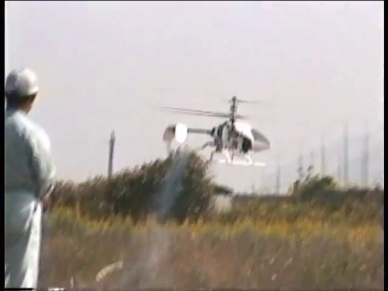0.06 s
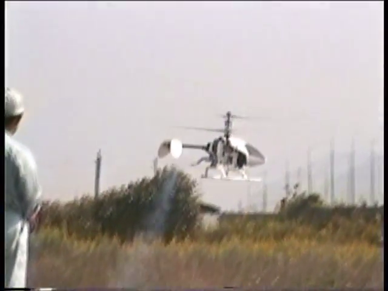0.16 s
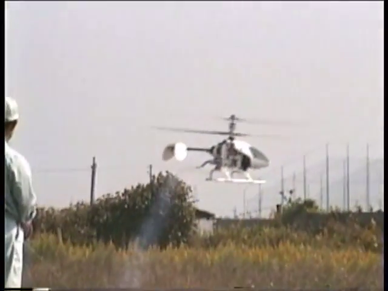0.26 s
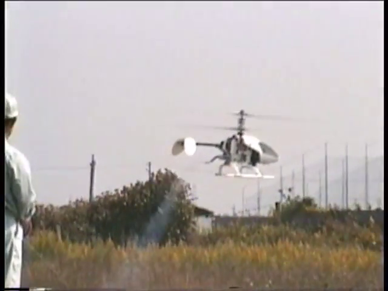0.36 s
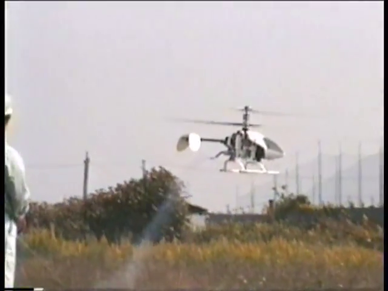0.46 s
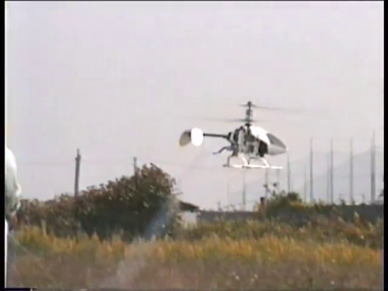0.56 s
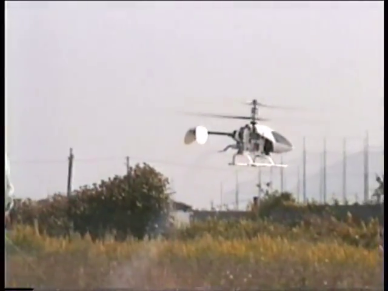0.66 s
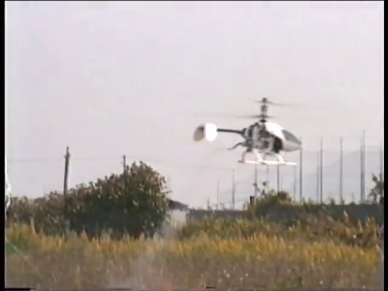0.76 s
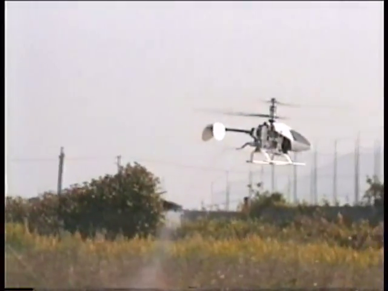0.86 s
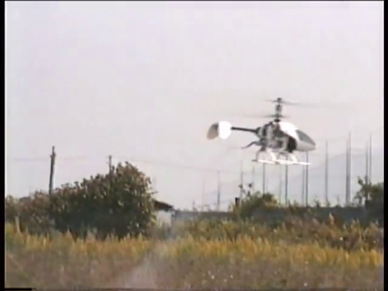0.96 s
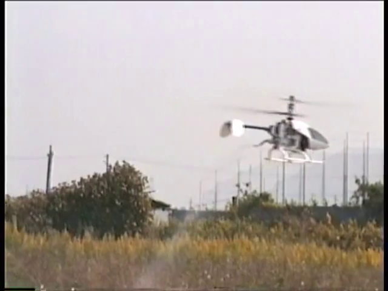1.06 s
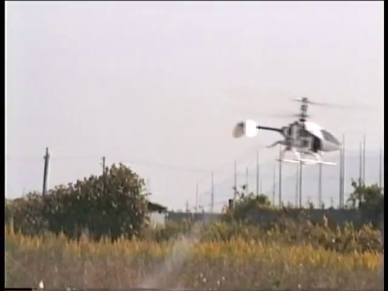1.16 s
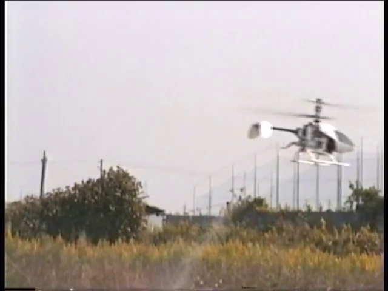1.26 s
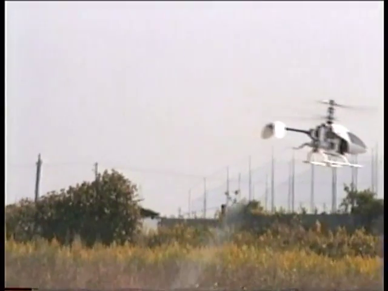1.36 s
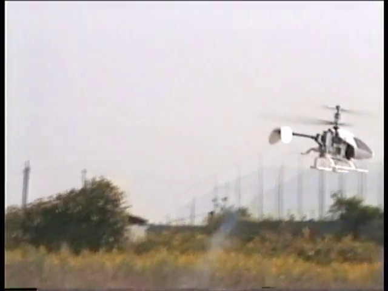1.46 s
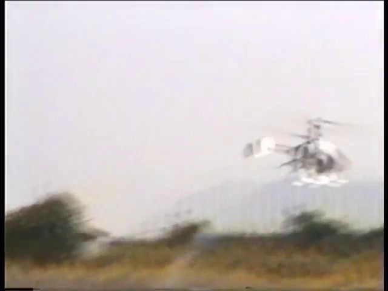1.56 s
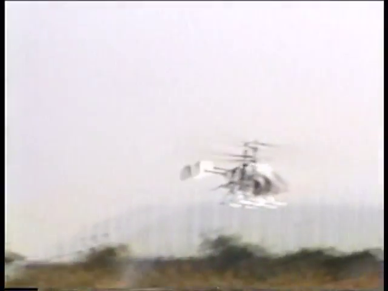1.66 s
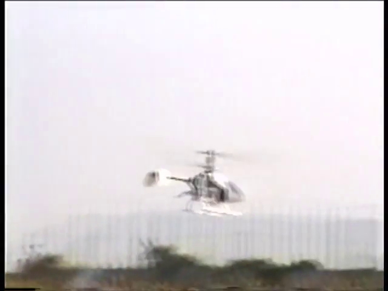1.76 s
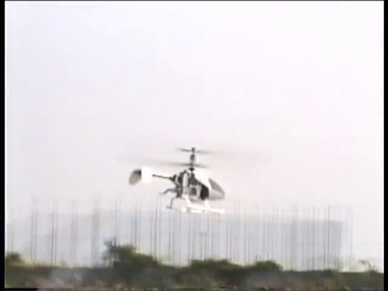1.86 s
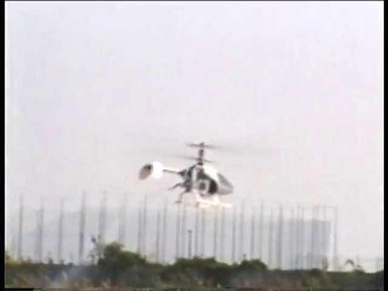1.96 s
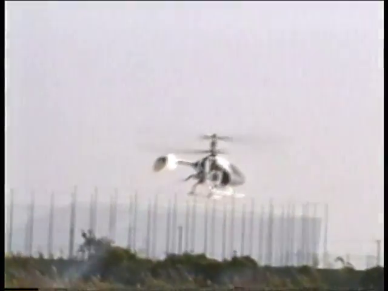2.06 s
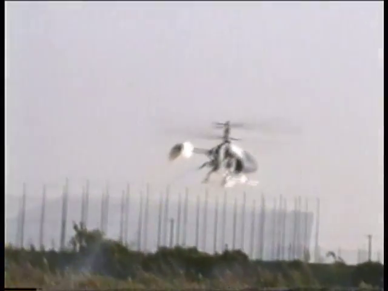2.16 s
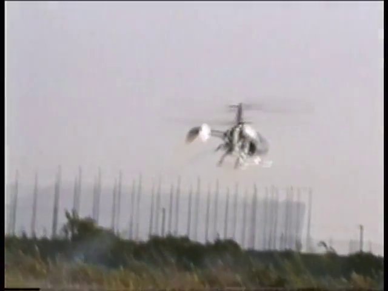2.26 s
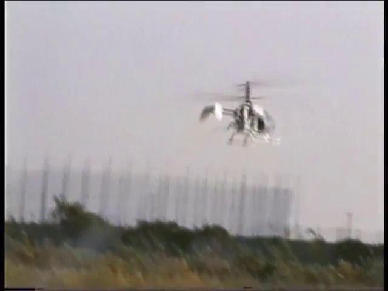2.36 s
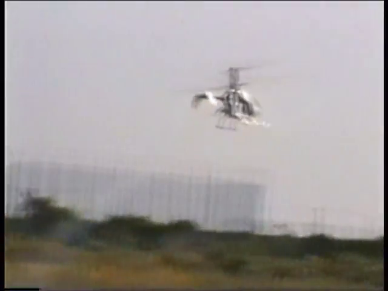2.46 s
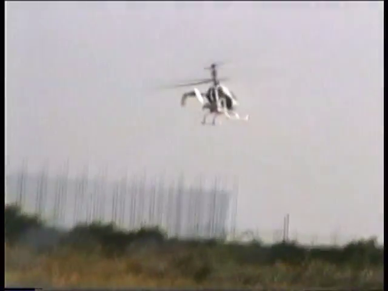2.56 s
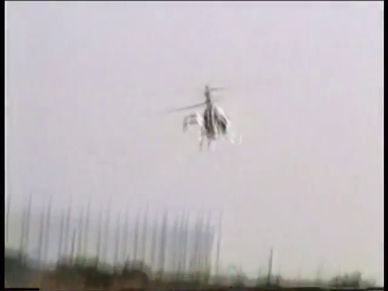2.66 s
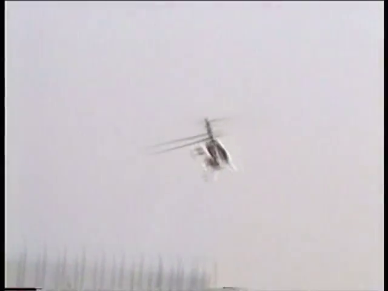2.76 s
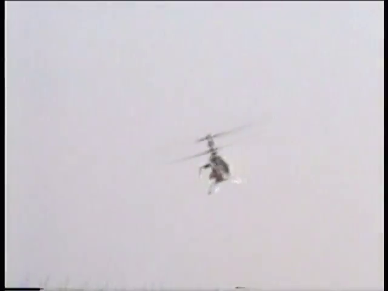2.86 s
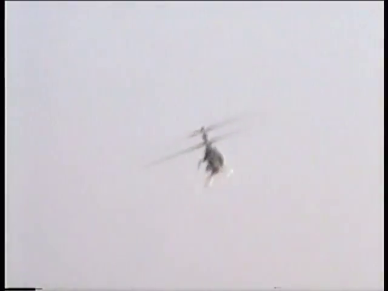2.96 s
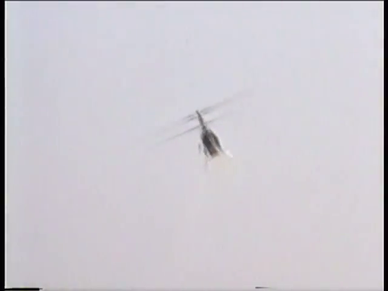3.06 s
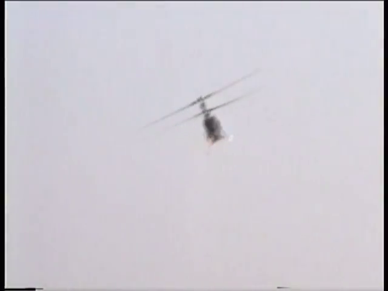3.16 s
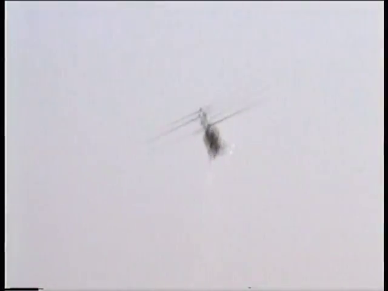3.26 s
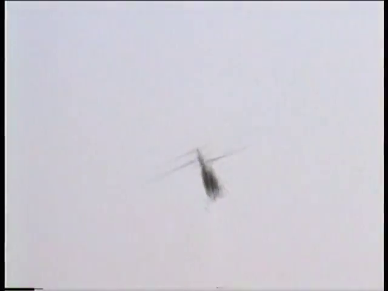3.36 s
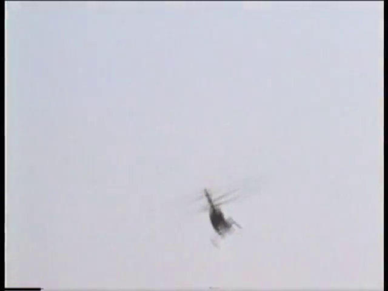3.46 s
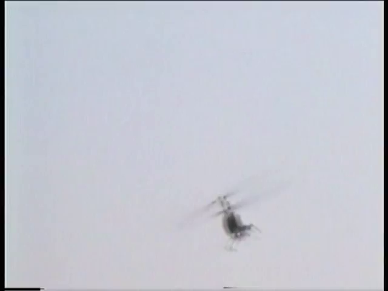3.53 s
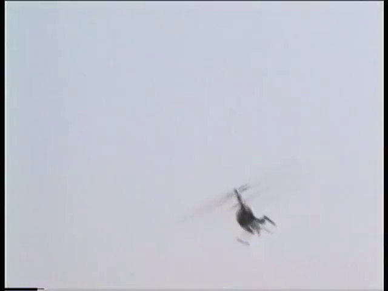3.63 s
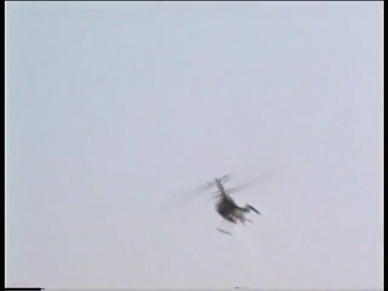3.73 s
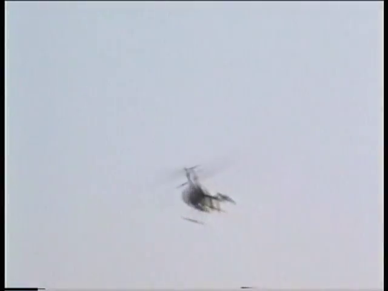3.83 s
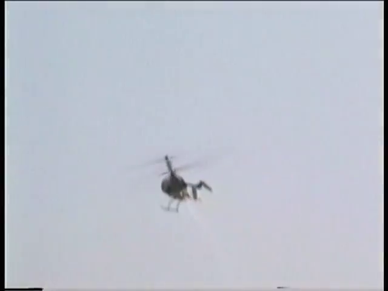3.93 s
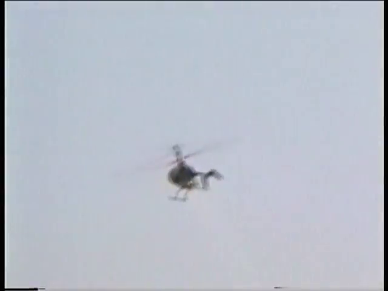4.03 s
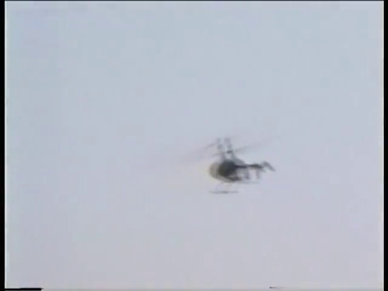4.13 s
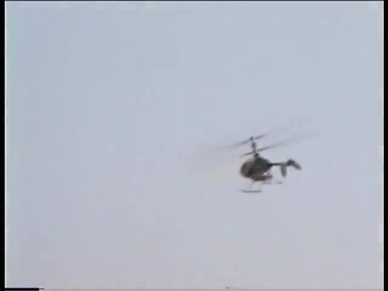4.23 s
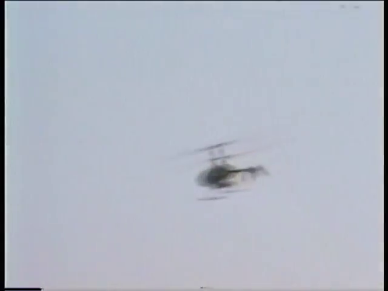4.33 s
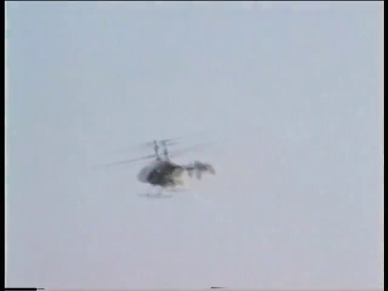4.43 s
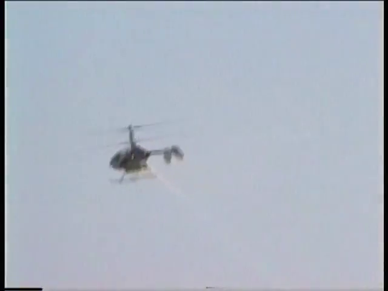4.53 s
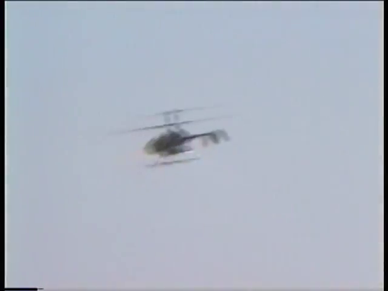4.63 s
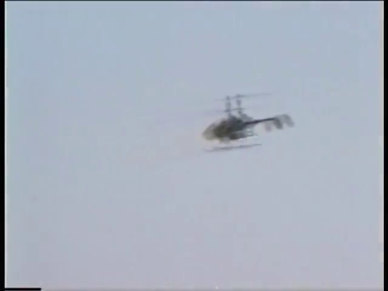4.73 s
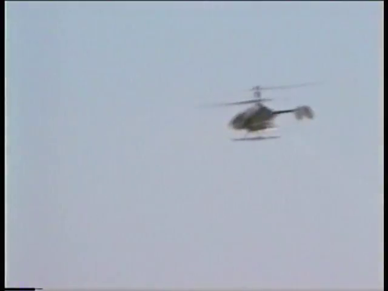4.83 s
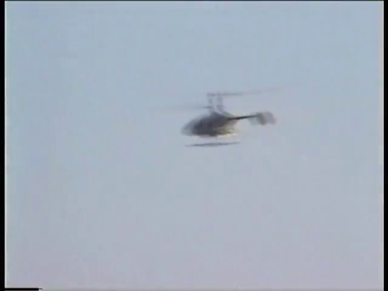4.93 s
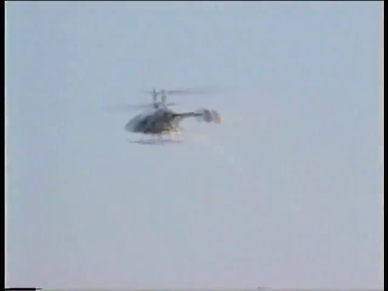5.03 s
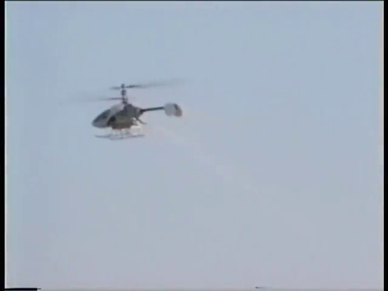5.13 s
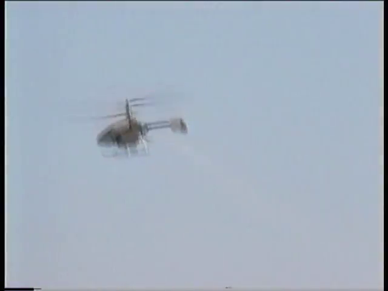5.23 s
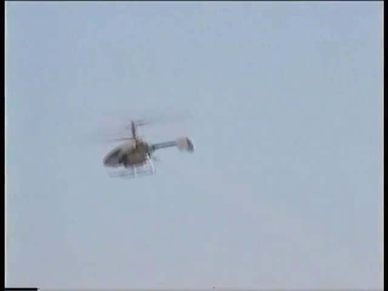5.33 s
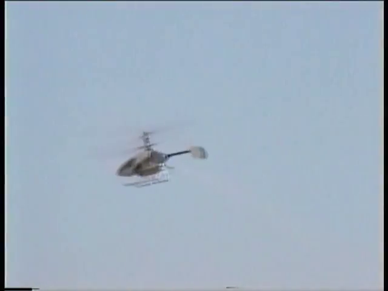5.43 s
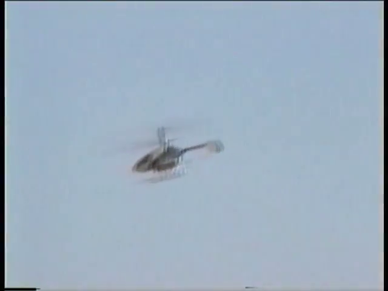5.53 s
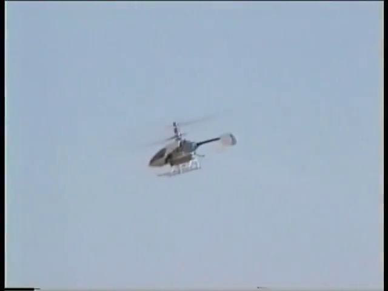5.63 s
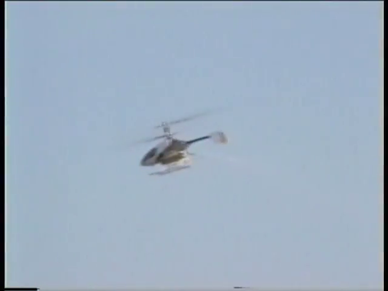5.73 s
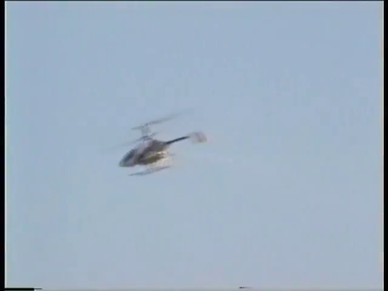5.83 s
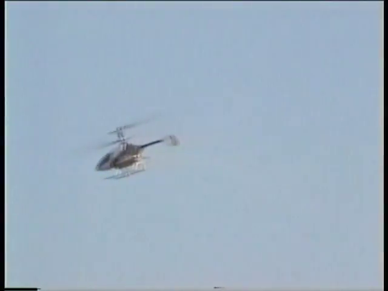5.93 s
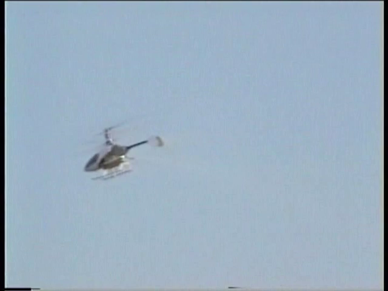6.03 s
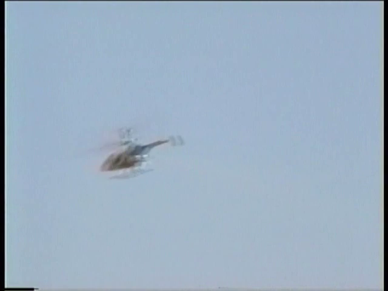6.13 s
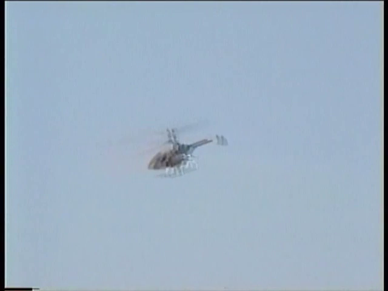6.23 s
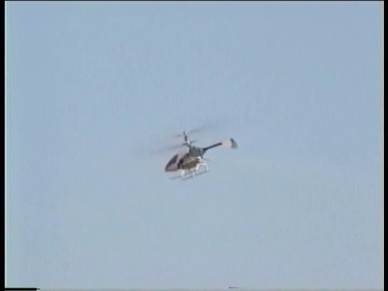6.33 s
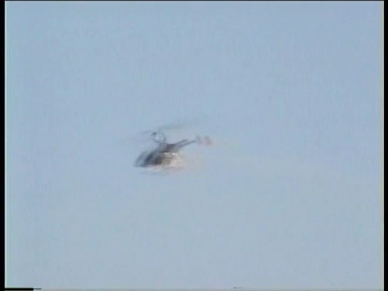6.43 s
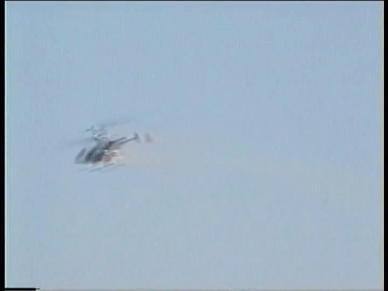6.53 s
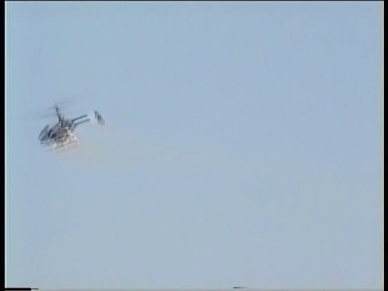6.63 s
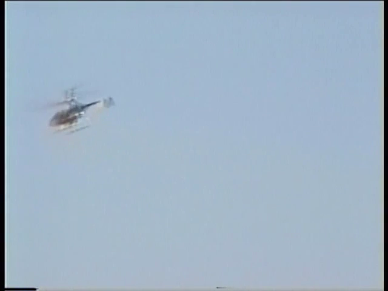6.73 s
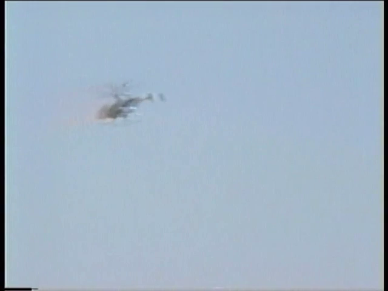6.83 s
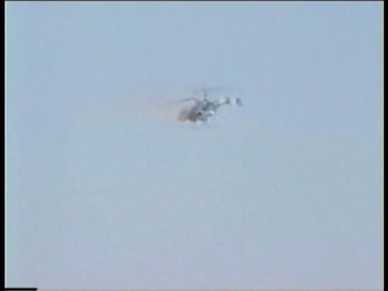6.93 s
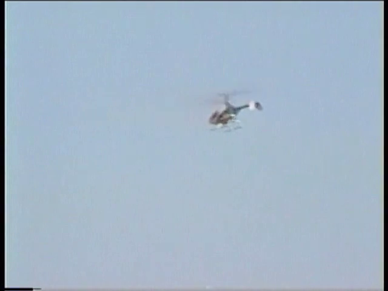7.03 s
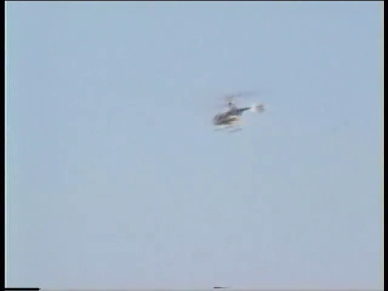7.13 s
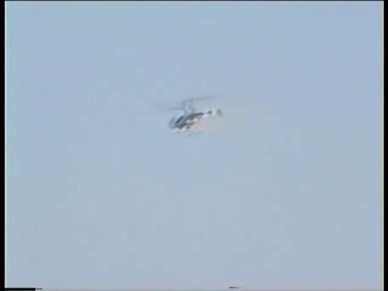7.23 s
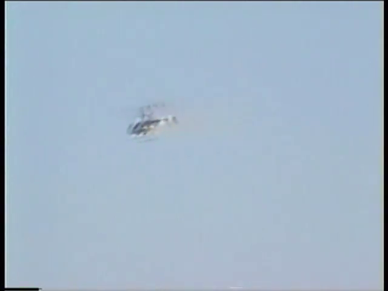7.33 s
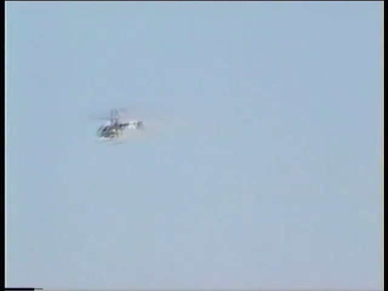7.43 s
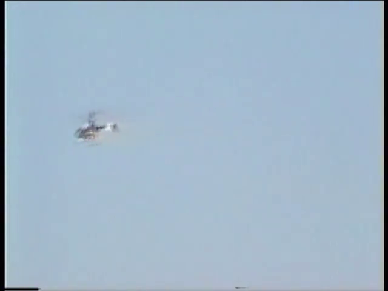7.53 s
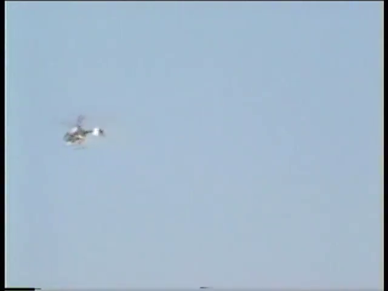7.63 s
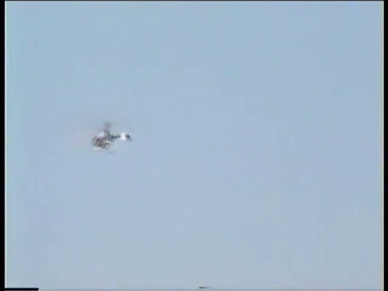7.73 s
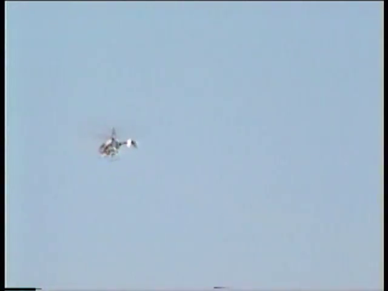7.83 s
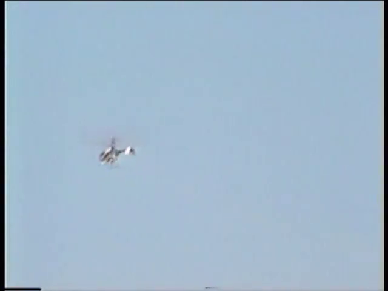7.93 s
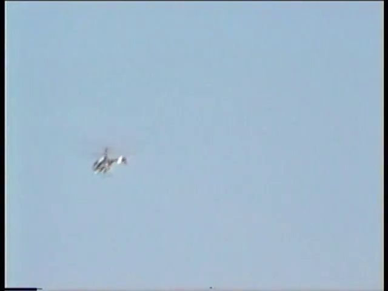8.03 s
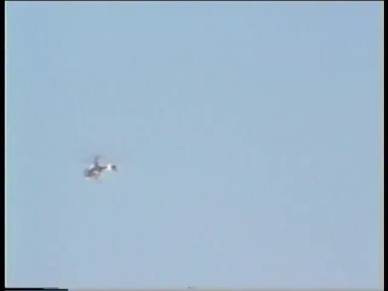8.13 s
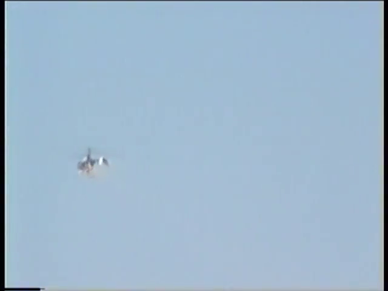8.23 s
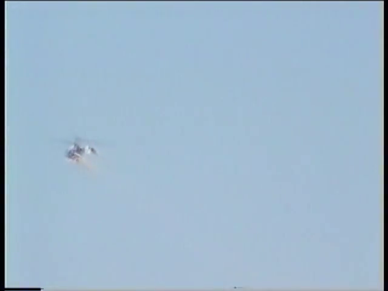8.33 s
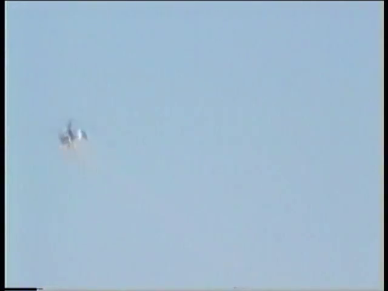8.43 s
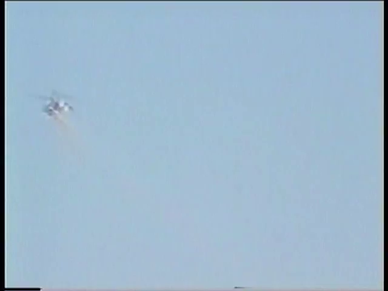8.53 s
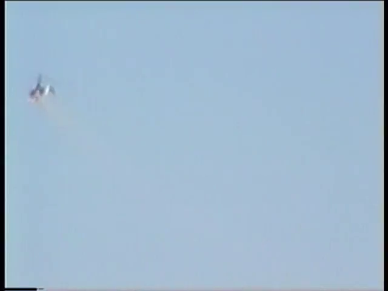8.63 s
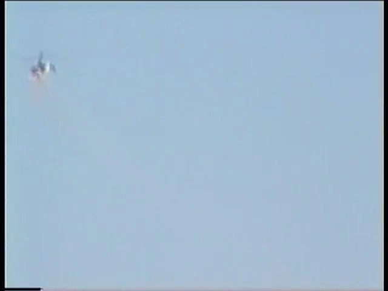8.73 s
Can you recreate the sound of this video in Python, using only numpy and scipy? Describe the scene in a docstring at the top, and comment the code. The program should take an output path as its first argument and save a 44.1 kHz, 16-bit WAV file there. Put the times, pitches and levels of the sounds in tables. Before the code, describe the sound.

Raspy, nasal drone of a small radio-controlled helicopter with hissing blades, its tone shifting as it turns overhead and flies away over a field.

```python
"""Over an open field a model helicopter with a small two-stroke glow engine hovers, climbs, turns and flies off.
The exhaust sings in orders of the firing rate, loudest at the muffler resonance; uneven firings and rasp roughen it.
Its colour changes as it turns, the rotor chops it, and a ground echo sweeps a comb through it as it climbs.
Around it are blade hiss, blade hum, churned air, a faint field rumble, soft housing knocks and one airy swish."""
import sys
import numpy as np
from scipy import signal
from scipy.fft import rfft, irfft, next_fast_len
from scipy.io import wavfile
from scipy.ndimage import uniform_filter1d

SR = 44100
rng = np.random.default_rng(int(sys.argv[2]) if len(sys.argv) > 2 else 0)


def master_out(mix):
    """Clip the mix to full scale and print it as 16-bit PCM to the path in sys.argv[1]."""
    frames = np.transpose(np.atleast_2d(mix))
    ceiling = np.clip(frames, -1, 1)
    pcm = np.round(ceiling * 32767).astype(np.int16)
    wavfile.write(sys.argv[1], SR, pcm)


N = 387198
TIME = np.arange(N) / SR  # s
FIRINGS_PER_BLADE = 4.76  # gearing: engine firings for each blade passage
FIRST_RASP_ORDER = 11  # from this order up the exhaust follows the roughness, not the note

# Exhaust orders: order (multiple of the firing rate), mean_db (relative to the note or the roughness),
# swing_db (with the view), loudest_view_degrees
EXHAUST_ORDERS = [(3, -56.5, 15, 287), (4, -44.5, 3.5, 185), (5, -57.5, 9, 141), (6, -40.5, 3.5, 49),
                  (7, -38, 0.5, 104), (8, -25.5, 1.9, 246), (9, -38.5, 5.5, 20), (10, -37.5, 6.5, 364),
                  (11, -12.5, 6, 291), (12, -18.5, 14, 131), (13, -13, 3, 340), (14, -11, 2, 100),
                  (15, -12.5, 2, 170), (16, -17, 14, 267)]
# Roughness of the exhaust (rasp, sizzle and high orders): start_s, level_db
ROUGHNESS_CURVE = [(0, -31.5), (.8, -31.5), (2.3, -33.5), (2.47, -31), (3, -33.5), (3.42, -30), (4.15, -36),
                   (4.4, -32), (5.35, -31.5), (5.9, -34), (6.9, -32), (8.2, -39), (8.44, -41.5),
                   (8.78, -43)]
# Spectrum of the fizzing top of the exhaust: frequency_hz, relative_density_db
SIZZLE_SPECTRUM = [(3300, -24), (4300, 1.5), (4800, -0.5), (5800, -1.5), (7000, -7.5), (7900, -5.5),
                   (9000, -17.5), (13000, -41)]
# Spectrum of air hissing off the blades: frequency_hz, relative_density_db
HISS_SPECTRUM = [(4000, -31), (7000, 8.5), (9000, 1), (10800, 9.5), (11800, 1), (12500, 12.5), (14000, -7)]
# Spectrum of churned air, also lent to the knocks: frequency_hz, relative_density_db
WASH_SPECTRUM = [(60, -15), (130, 10.5), (200, 6), (320, 5.5), (550, -8), (900, -43), (2000, -13.5)]


def from_db(db):
    """Decibels to gain."""
    return np.exp(np.asarray(db) * np.log(10) / 20)


def rms_one(x):
    """Scale to unit power."""
    return x / np.sqrt(np.mean(x ** 2) + 1e-20)


def in_time(rows):
    """Read each column of a curve table, sample by sample."""
    start_s, *columns = np.transpose(rows)
    return [np.interp(TIME, start_s, column) for column in columns]


def at_hz(points, hz):
    """Read a spectrum on a log-frequency axis."""
    points_hz, values = np.array(points).T
    return np.interp(np.log(hz), np.log(points_hz), values)


def drift(rate_hz):
    """Slow random wander of unit rms: noise through two equal one-pole low-passes."""
    step = 40  # samples between slow values
    r = np.exp(-2 * np.pi * rate_hz * step / SR)
    raw = rng.standard_normal(N // step + 2002)
    slow = signal.lfilter([1], [1, -2 * r, r * r], raw)[2000:]  # drop the start-up
    return np.interp(np.arange(N) / step, np.arange(len(slow)), rms_one(slow))


def noise(spectrum):
    """Stereo noise of a given colour; its mid signal has rms 1 and its width varies with frequency."""
    # Left-right likeness of the noises: frequency_hz, likeness (0 to 1)
    likeness = [(30, .15), (70, 0.2), (150, 0.34), (300, 0.077), (600, 0.067), (1200, 0.45), (5000, 0.99),
                (8000, 0.94), (10000, 0.18), (13000, 0.28)]
    size = next_fast_len(N)
    hz = np.maximum(np.fft.rfftfreq(size, 1 / SR), 1)
    mid, side = rfft(rng.standard_normal((2, size))) * from_db(at_hz(spectrum, hz))
    alike = np.clip(at_hz(likeness, hz), 0, 1)
    side = side * np.sqrt((1 - alike) / (1 + alike))
    mid, side = irfft(mid, size)[:N], irfft(side, size)[:N]
    return np.array([mid + side, mid - side]) / np.std(mid)


def resonance(x, hz, width_hz):
    """A two-pole band-pass with gain 1 on top."""
    r = np.exp(-np.pi * width_hz / SR)
    zeros = np.array([1, 0, -1]) * (1 - r * r) / 2
    poles = [1, -2 * r * np.cos(2 * np.pi * hz / SR), r * r]
    return signal.lfilter(zeros, poles, x + 1e-18)


def per_firing(turns):
    """A new random value for each firing, joined by straight lines."""
    values = rng.standard_normal(N // 100)
    return np.interp(turns, np.arange(len(values)), values)


def beamed(mean_db, swing_db, toward_deg, view_deg):
    """Level of a sound that is loudest on one side of the machine and weakest on the other."""
    return mean_db + swing_db * np.cos(np.radians(view_deg - toward_deg))


def ground_echo(x, strength):
    """Direct sound plus its reflection, dulled by the grass, at nearly unchanged power."""
    # Lag of the echo, following the height: start_s, lag_ms
    echo_lag = [(0, .28), (2.4, .39), (2.75, .6), (3.45, .82), (4, 1.01), (4.9, 1.17), (5.35, 1.28),
                (5.65, 1.39), (6.05, 1.465), (6.6, 1.39), (7.6, 1.29), (8.1, 1.39), (8.78, 1.5)]
    lag_ms, = in_time(echo_lag)
    # grass reflects inverted at grazing angles (short lag) and upright at steep ones
    factor = strength * np.interp(lag_ms, [.39, .6], [-0.23, 0.54])
    dull = signal.lfilter(*signal.butter(1, 8000, fs=SR), np.atleast_2d(x))
    late = np.array([np.interp(TIME - lag_ms / 1000, TIME, channel) for channel in dull])
    return (x + factor * late) / np.sqrt(1 + factor ** 2)


def open_field(level_db=-48.5):
    """Faint, slowly wavering low rumble of the open field, a little stronger on the left."""
    # Spectrum of the field: frequency_hz, relative_density_db
    field_spectrum = [(20, -23), (35, 6), (55, 5.5), (100, 6.5), (150, -2.5), (300, -11), (700, -10),
                      (2000, -26), (12000, -52)]
    gain = from_db(level_db + 0.5 * drift(1.3))
    return gain * noise(field_spectrum) * from_db([[1.2], [-1.2]])


def knocks(ring_db=-3.0, thud_db=-10.0, thud_t60_s=0.18):
    """Soft bumps on the microphone's housing: a decaying noise thud and damped ringing modes."""
    # Bumps: start_s, strike_db
    bumps = [(.334, -24.5), (.35, -27), (.368, -43), (1.136, -39)]
    # Housing modes: pitch_hz, relative_db, t60_s
    housing_modes = [(158, -19, 0.062), (350, -21, .07), (417, -0.5, 0.13), (503, 0.5, 0.046),
                     (1080, -10, 0.06), (1090, -9, 0.067)]
    taps = np.zeros(N)
    for start_s, strike_db in bumps:
        taps[round(start_s * SR)] = from_db(strike_db)
    dying = signal.lfilter([1], [1, -from_db(-60 / (thud_t60_s * SR))], taps + 1e-18)
    out = from_db(thud_db) * dying * noise(WASH_SPECTRUM)
    for hz, db, t60_s in housing_modes:
        r = from_db(-60 / (t60_s * SR))
        w = 2 * np.pi * hz / SR
        ring = signal.lfilter([0, np.sin(w)], [1, -2 * r * np.cos(w), r * r], taps + 1e-18)
        out += from_db(db + ring_db) * ring
    return out


def swish(at_s=8.3, width_s=0.072, sizzle_db=-37.0, hiss_db=-50.0):
    """A short, airy swell of sizzle and blade hiss as the machine turns away."""
    swell = np.exp(-((TIME - at_s) / width_s) ** 4)
    return swell * (from_db(sizzle_db) * noise(SIZZLE_SPECTRUM) + from_db(hiss_db) * noise(HISS_SPECTRUM))


def rotor_wash(trim_db=5.5):
    """Air churned by the rotor: low, broad noise."""
    # Churning: start_s, level_db (before the trim)
    wash_curve = [(0, -54), (2.64, -49), (3.69, -60.5), (4.96, -57.5), (6.2, -61), (6.6, -56.5),
                  (8.78, -68)]
    return from_db(in_time(wash_curve)[0] + trim_db) * noise(WASH_SPECTRUM)


def blade_hum(blades):
    """Low tones at two and three times the blade rate, wandering in level and phase."""
    # Hum tones, lowest first: level_db
    hum_levels = [-57, -59]
    hum = np.zeros(N)
    for order, level_db in enumerate(hum_levels, 2):
        hum += from_db(level_db + drift(5.7)) * np.sin(order * blades + drift(3.9))
    return hum


def piston_pulse(turns, firing_depth=0.16, port_depth=0.036):
    """Gas flow swelling once, and slightly twice, per firing."""
    return 1 + firing_depth * np.cos(2 * np.pi * turns) + port_depth * np.cos(4 * np.pi * turns)


def rotor_chop(blades, blade_depth=0.035, rotor_depth=0.013):
    """Level swaying with each blade and each pair of blades, with a random flicker."""
    sway = 1 + blade_depth * np.cos(blades) + rotor_depth * np.cos(blades / 2)
    return sway * from_db(0.94 * drift(35))


def blade_hiss(piston, rotor, echo_strength=0.65):
    """Bright hiss off the blades, pulsed by piston and rotor, mirrored by the ground, slightly right."""
    # Hiss: start_s, level_db
    hiss_curve = [(0, -43.5), (.8, -45), (1.6, -42), (2.5, -43), (3.2, -47), (3.7, -54), (4.5, -47),
                  (6.28, -48), (6.42, -42.5), (6.9, -45.5), (8.2, -54), (8.78, -60)]
    gain = from_db(in_time(hiss_curve)[0] + 1.2 * drift(22))
    hiss = gain * noise(HISS_SPECTRUM) * from_db([[-.6], [.6]])
    return ground_echo(hiss * piston * rotor, echo_strength)


def exhaust_orders(turns, levels, flutter_db, jitter_turns):
    """One line per order; firings come slightly early or late and the air makes each line flutter."""
    uneven_turns = turns + jitter_turns * per_firing(turns)
    phase = (2 * np.pi * (uneven_turns % 2)).astype(np.float32)  # two firings, so half orders close
    mid, side = np.zeros(N), np.zeros(N)
    for order, level_db in levels:
        # the muffler disperses each firing into two even humps
        angle = order * phase + np.pi / 2 * order ** 2 + rng.normal(0, .45)
        gain = np.sqrt(2) * from_db(level_db + flutter_db * drift(6.2))
        line = gain * np.sin(angle)
        mid += line
        # stray reflections shift each line about, the low ones most
        side += .35 / np.sqrt(order) * drift(1) * line
        # the right capsule leads a little
        side -= .2 * gain * np.cos(angle)
    return np.array([mid + side, mid - side])


def exhaust_rasp(turns, view, piston, rotor, echo_strength=0.98):
    """Gas rasps and sizzles in step with the piston over a buzz of weak high orders; the ground mirrors it."""
    # Spectrum of the rasp: frequency_hz, relative_density_db
    rasp_spectrum = [(600, -17), (1000, -12.5), (1400, -8), (2200, -6.5), (2650, -5), (3200, -3), (3700, 3),
                     (4200, -6), (5000, -24)]
    # How each radiates: mean_db, swing_db, loudest_view_degrees
    rasp_beam, sizzle_beam = (-1.2, 0.57, 200), (-3.04, 0.53, 395)
    roughness, = in_time(ROUGHNESS_CURVE)
    rasp = from_db(roughness + beamed(*rasp_beam, view)) * noise(rasp_spectrum)
    sizzle = from_db(roughness + beamed(*sizzle_beam, view)) * noise(SIZZLE_SPECTRUM)
    # above the listed orders, eight more fade by 1.6 dB each
    first = round(EXHAUST_ORDERS[-1][0]) + 1
    weak = [(first + k, roughness - 13 - 1.6 * k) for k in range(8)]
    buzz = exhaust_orders(turns, weak, flutter_db=2.0, jitter_turns=.002)
    return ground_echo(((rasp + sizzle) * piston + buzz) * rotor, echo_strength)


def low_drone(turns, flutter_db, trim_db=-0.5):
    """Low drone at the firing rate and its octave."""
    # Drone: start_s, firing_rate_db, octave_db (both before the trim)
    drone_curve = [(0.0, -49, -44.5), (2.08, -46.5, -43), (2.91, -42, -50.5), (3.4, -44, -48.5),
                   (3.64, -45.5, -57.5), (4.94, -46.5, -53.5), (5.06, -46, -46), (5.4, -44, -52),
                   (6.14, -54, -42.5), (6.53, -54.5, -50), (7.16, -48, -53), (8.78, -51.5, -53.5)]
    levels = [(order, db + trim_db) for order, db in enumerate(in_time(drone_curve), 1)]
    return exhaust_orders(turns, levels, flutter_db, jitter_turns=.002)


def uneven_firings(turns, puff_share=0.98):
    """No two firings are equally strong; the excess and a puff of gas ring the muffler."""
    # Muffler resonances: pitch_hz, width_hz, relative_db
    muffler = [(1527, 160, -12), (1860, 170, 0), (2170, 360, -8.5)]
    # Ringing, dying down as the engine unloads: start_s, level_db
    ringing_curve = [(0, -32), (2.3, -33), (3, -35), (3.7, -34), (4.5, -35), (5.3, -35), (6, -34),
                     (6.6, -35), (7.3, -40.5), (8.78, -46.5)]
    kicks = rng.standard_normal(N) * np.diff(np.floor(turns), prepend=0)
    puffs = rng.standard_normal(N) * (1 + np.cos(2 * np.pi * turns))
    drive = rms_one(kicks) + puff_share * rms_one(puffs)
    rings = np.zeros(N)
    for k, (hz, width_hz, db) in enumerate(muffler):
        rings += (-1) ** k * from_db(db) * resonance(drive, hz, width_hz)  # alternating polarity
    band = signal.butter(2, [1300, 2400], "band", fs=SR, output="sos")
    rings = signal.sosfilt(band, rings)
    steady = rings / np.sqrt(uniform_filter1d(rings ** 2, size=900) + 1e-12)  # even over several firings
    return from_db(in_time(ringing_curve)[0]) * steady


def exhaust_note(turns, blades, view, flutter_db, chop=0.017, shake=0.1, trim_db=-0.12, wobble_turns=0.0054):
    """Orders of the firing rate, swayed in level and phase by each blade and in level by each firing."""
    # Strength of the note, from load and distance: start_s, level_db (before the trim)
    note_curve = [(0, .5), (.55, 1.5), (1, 1), (1.25, 4), (1.65, 0), (2.1, 0.5), (2.6, 3.5), (3.1, 2),
                  (3.4, 5), (3.85, 3), (4.1, 2), (4.4, 2), (5.3, 3), (5.55, 2.5), (5.85, 0), (6.05, 3.5),
                  (6.85, 2), (7.22, -4.5), (7.46, -2), (7.8, -4.5), (8.05, -1), (8.4, -5), (8.78, -10.5)]
    # Strong-weak alternation of the firings: start_s, relative_db
    alternation_curve = [(0, 0), (2.3, 3), (3, -22), (5.7, -2), (6, -17), (6.6, -17), (8.78, -29)]
    # Half orders: the whole order below each, and relative_db of each
    orders_below, half_levels = (3, 6, 7, 8, 9, 10), [-78, -50, -47.5, -54.5, -43, -54]
    loudness, = in_time(note_curve)
    roughness, = in_time(ROUGHNESS_CURVE)
    alternation, = in_time(alternation_curve)
    levels = []
    for order, mean_db, swing_db, toward_deg in EXHAUST_ORDERS:
        strength = trim_db + loudness if order < FIRST_RASP_ORDER else roughness
        levels.append((order, strength + beamed(mean_db, swing_db, toward_deg, view)))
    # every second firing is a little weaker, which adds lines halfway between the orders
    levels += [(order + .5, db + alternation) for order, db in zip(orders_below, half_levels)]
    wobbly_turns = turns + wobble_turns * np.sin(blades)
    note = exhaust_orders(wobbly_turns, levels, flutter_db, jitter_turns=0.0027)
    return note * (1 + chop * np.cos(blades) + shake * per_firing(turns))


def engine(turns, blades, view, flutter_db=1.07, echo_strength=0.84):
    """Exhaust note and muffler ringing with their ground echo, over the drone; slightly left."""
    singing = exhaust_note(turns, blades, view, flutter_db) + uneven_firings(turns)
    exhaust = ground_echo(singing, echo_strength) + low_drone(turns, flutter_db)
    return exhaust * from_db([[.3], [-.3]])


def scene():
    """The rotor is geared to the engine; field, knocks and swish lie around the machine."""
    # Engine speed: start_s, firing_rate_hz
    speed_curve = [(0, 222.6), (.81, 222.6), (2.01, 222), (2.73, 223.5), (3.07, 222.7), (3.59, 222.7),
                   (4.02, 225), (4.46, 226.7), (4.7, 226.1), (5.03, 224.5), (5.86, 224.9), (6.61, 222.9),
                   (7.32, 220.1), (7.97, 216.8), (8.41, 216.8), (8.78, 218)]
    # Side the machine is heard from: start_s, view_degrees (0 its right, 90 nose, 180 its left, 270 tail)
    view_curve = [(0, 5), (2.3, 35), (2.9, 125), (3.5, 147), (4.3, 196), (6.2, 177), (7.4, 203),
                  (8.78, 213)]
    turns = np.cumsum(in_time(speed_curve)[0]) / SR  # firings so far
    view, = in_time(view_curve)
    blades = 2 * np.pi * turns / FIRINGS_PER_BLADE + .8 * drift(5)  # blade phase in radians, loosely geared
    piston, rotor = piston_pulse(turns), rotor_chop(blades)
    surroundings = open_field() + knocks() + swish()
    air = rotor_wash() + blade_hum(blades) + blade_hiss(piston, rotor)
    rasp = exhaust_rasp(turns, view, piston, rotor)
    return surroundings + air + rasp + engine(turns, blades, view)


def record(dry):
    """A steep elliptic low-pass cuts the top above 13.7 kHz."""
    return signal.sosfilt(signal.ellip(12, .1, 90, 13700, fs=SR, output="sos"), dry)


dry = scene()
out = record(dry)
master_out(out)
```